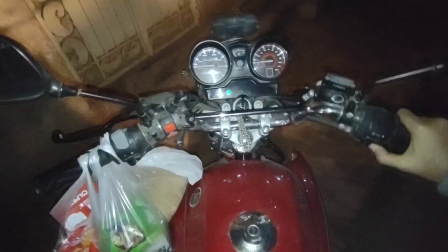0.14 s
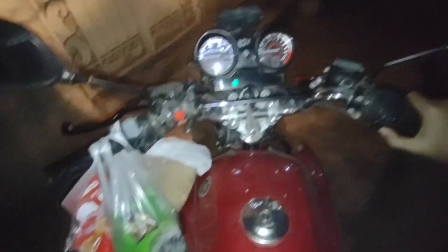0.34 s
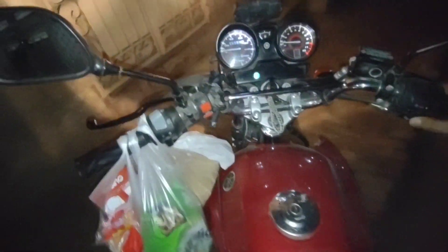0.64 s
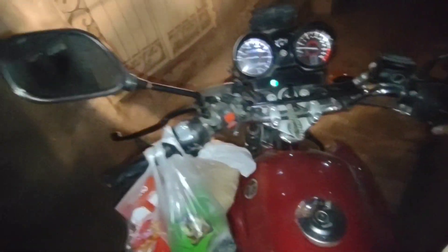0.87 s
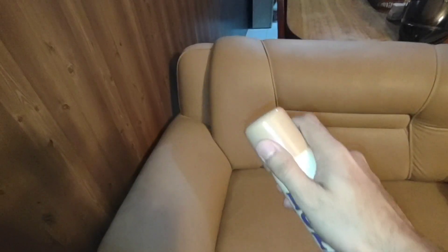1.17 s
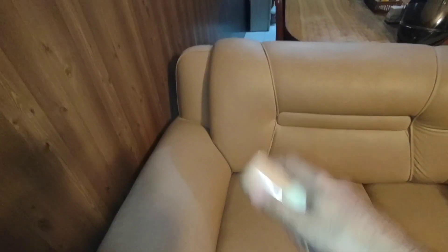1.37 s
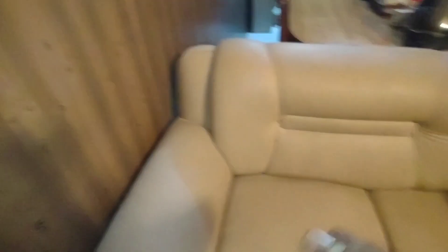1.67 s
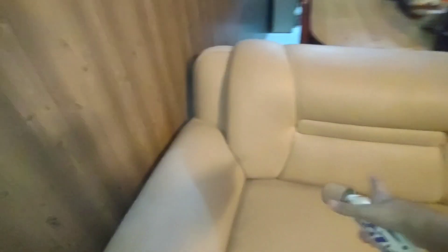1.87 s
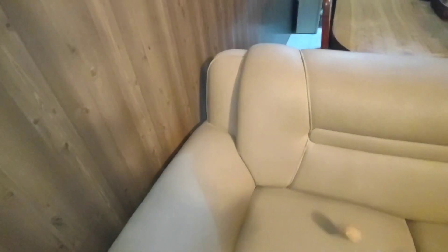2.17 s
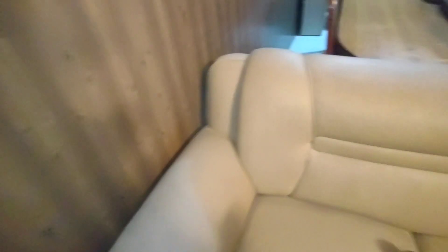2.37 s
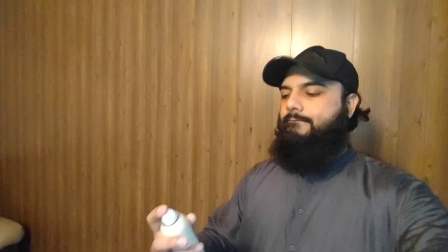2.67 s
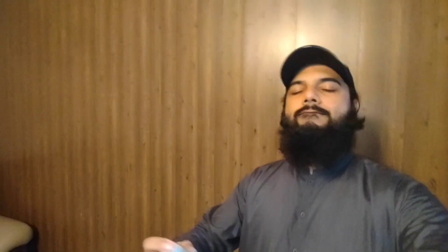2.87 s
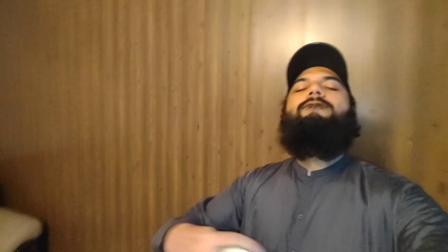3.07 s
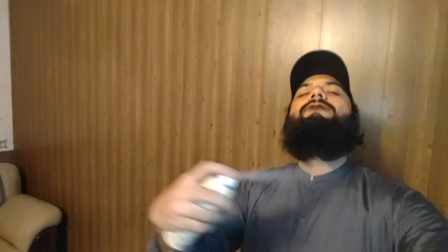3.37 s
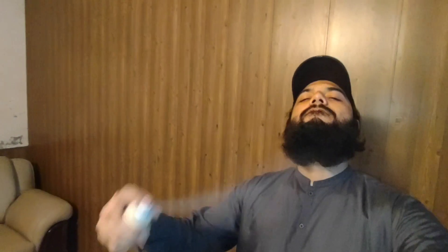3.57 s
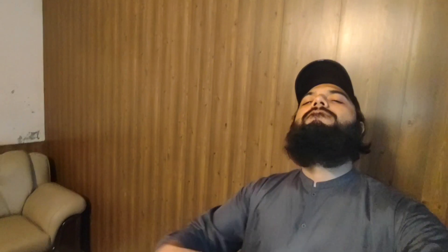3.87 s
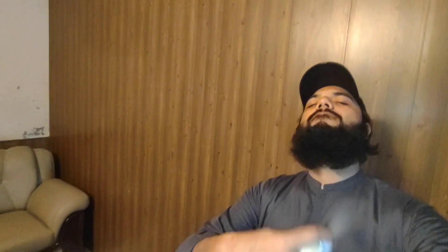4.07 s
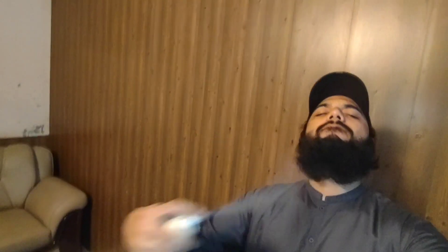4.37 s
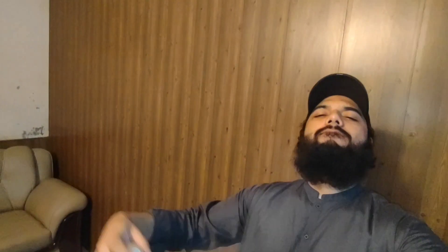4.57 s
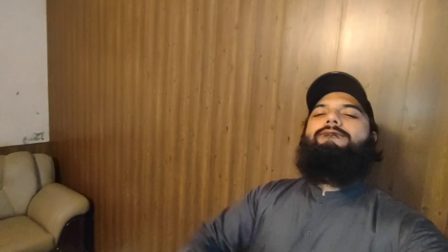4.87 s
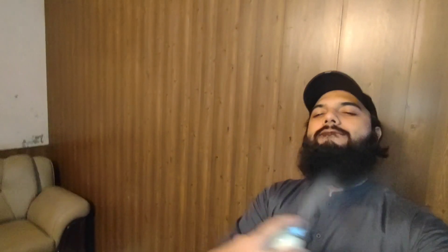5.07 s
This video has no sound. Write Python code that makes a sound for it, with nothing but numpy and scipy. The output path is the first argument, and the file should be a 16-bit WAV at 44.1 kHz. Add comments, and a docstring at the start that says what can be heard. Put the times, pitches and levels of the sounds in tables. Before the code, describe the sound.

After a motorcycle cranks and briefly revs, a spray can lands softly on a cushion indoors, then hisses steadily, sweeping from side to side.

```python
"""Beside a motorcycle, then in a humming room: three short scenes on a stereo microphone, cut hard.
The starter gear whines and grinds; the single cylinder fires, revs up and is cut off abruptly.
Indoors an arm swishes and an aerosol can thumps onto a padded sofa, bounces and settles, cap ticking.
After a moment of silence its valve opens and the jet hisses, swept from side to side by hand."""
import sys
import numpy as np
from scipy import signal
from scipy.fft import rfft, irfft
from scipy.io import wavfile
from scipy.ndimage import uniform_filter1d, map_coordinates

SR = 44100
rng = np.random.default_rng(int(sys.argv[2]) if len(sys.argv) > 2 else 0)


def dump(signal):
    """Clip the signal to [-1, 1] and save it as 16-bit WAV at the path in sys.argv[1]."""
    limited = np.clip(np.atleast_2d(signal).T, -1, 1)
    pcm = np.round(limited * 32767).astype(np.int16)
    wavfile.write(sys.argv[1], SR, pcm)


N = 231084
TIME = np.arange(N) / SR
BIN_HZ = np.maximum(np.arange(N // 2 + 1) * SR / N, 1)


def from_db(db):
    """Decibels to gain."""
    return 10 ** (np.asarray(db) / 20)

def unit_rms(x):
    """Scale to rms 1."""
    return x / np.sqrt(np.mean(x ** 2) + 1e-20)

def over_time(rows):
    """Each column of a (time, values...) table at every sample."""
    times, *columns = np.transpose(rows)
    return [np.interp(TIME, times, column) for column in columns]

def over_bins(points):
    """A (frequency, value) table at every bin, joined on a log axis."""
    hz, value = np.transpose(points)
    return np.interp(np.log(BIN_HZ), np.log(np.maximum(hz, 1)), value)

def ramp(start_s, rise_s):
    """Rise from 0 to 1."""
    return np.clip((TIME - start_s) / rise_s, 0, 1)

def between(start_s, end_s, fade_s=0.00081):
    """Open from start to end, with short ramps."""
    return np.clip(np.minimum(TIME - start_s, end_s - TIME) / fade_s, 0, 1)

def drift(hz):
    """Random wander of rms 1, mostly slower than hz."""
    return unit_rms(irfft(rfft(rng.standard_normal(N)) / (1 + (BIN_HZ / hz) ** 2), N))

def noise(spectrum, likeness):
    """Stereo noise of a given colour and left-right likeness, falling away beyond its ends; rms 1."""
    mid, side = rfft(rng.standard_normal((2, N)))
    alike = np.clip(over_bins(likeness), -1, 1)
    skirts = np.minimum(1, np.minimum(BIN_HZ / spectrum[0][0], spectrum[-1][0] / BIN_HZ)) ** 4
    pair = np.sqrt(1 + alike) * mid + np.sqrt(1 - alike) * side * np.array([[1], [-1]])
    return unit_rms(irfft(pair * from_db(over_bins(spectrum)) * skirts, N))

def cut(x, hz, kind, order=2):
    """A low-pass or high-pass."""
    return signal.sosfilt(signal.butter(order, hz, kind, fs=SR, output="sos"), x + 1e-18)

def resonate(x, resonances):
    """Parallel resonances of (frequency [Hz], width [Hz], level [dB])."""
    out = 0
    for hz, width, db in resonances:
        r, w = np.exp(-np.pi * width / SR), 2 * np.pi * hz / SR
        gain, poles = (1 - r * r) / 2, [1, -2 * r * np.cos(w), r * r]
        out += from_db(db) * signal.lfilter([gain, 0, -gain], poles, x + 1e-18)
    return out

def strike(clicks, modes):
    """Clicks ring modes of (frequency [Hz], level [dB], t60 [s])."""
    out = 0
    for hz, db, t60 in modes:
        r, w = from_db(-60 / (t60 * SR)), 2 * np.pi * hz / SR
        poles = [1, -2 * r * np.cos(w), r * r]
        out += from_db(db) * signal.lfilter([0, np.sin(w)], poles, clicks + 1e-18)
    return out

def impulses(events):
    """One click for each (time [s], level [dB])."""
    out = np.zeros(N)
    for s, db in events:
        out[round(s * SR)] += from_db(db)
    return out

def die_away(clicks, t60):
    """An envelope that jumps at each click and decays."""
    return signal.lfilter([1], [1, -np.exp(-np.log(1000) / (t60 * SR))], clicks + 1e-18)

def steady(x, samples=4000):
    """Hold the slow level at 1 and keep the fast beats."""
    power = np.mean(np.atleast_2d(x) ** 2, axis=0)
    slow_power = uniform_filter1d(uniform_filter1d(power, samples), samples // 2)
    return x / np.sqrt(np.abs(slow_power) + 1e-14)

def pan(x, left_db):
    """Make the left side louder than the right by left_db."""
    return x * from_db(left_db * np.array([[1], [-1]]) / 2)

def lead_left(x, ms):
    """Let a sound reach the left of the microphone first."""
    fine = signal.resample_poly(x * np.ones((2, 1)), 2, 1, axis=1)
    return np.array([map_coordinates(side, [2 * SR * (TIME + sign * ms / 2000)], order=1)
                     for side, sign in zip(fine, (1, -1))])

def reflections(x, t60, dull_hz):
    """A diffuse tail of unit energy, different on each side, dull on top."""
    t = TIME[:SR // 2]
    tail = rng.standard_normal((2, len(t))) * np.exp(-np.log(1000) * t / t60) * (t > .004)
    tail = cut(tail, dull_hz, "low", order=1)
    tail /= np.sqrt(np.sum(tail ** 2) / 2)
    return signal.fftconvolve(np.atleast_2d(x), tail, axes=1)[:, :N]


# the room across the microphone: (frequency [Hz], left-right likeness [0..1])
ROOM_LIKENESS = [(130, 0.94), (300, 0.81), (640, 0.29), (1400, 0.1), (8000, 0.05)]
# the air in each indoor scene, and the tones of the hum: (frequency [Hz], level [dB])
AIR_AT_SOFA = [(24, -42.5), (40, -28), (82, -4), (119, -34.5), (156, -5), (206, -5.5), (338, -12.5),
               (422, -23), (582, -20), (728, -26), (845, -25.5), (1260, -31), (3300, -36), (5990, -42.5),
               (15000, -46.5)]
AIR_AT_SPRAY = [(29, -63), (50, -26), (91, -18), (105, -18), (124, 0.5), (150, -18), (209, -4.5),
                (242, -23.5), (272, -13), (399, -23), (643, -19.5), (742, -24), (919, -22), (1670, -34),
                (15000, -47.5)]
HUM_TONES = [(124.5, 0), (201, 0)]

def room_tone(air, hum_db, waver=0.0094):
    """Low moving air all round the microphone, with a wavering hum."""
    hum = 0
    for hz, db in HUM_TONES:
        gain = from_db(db + 2.1 * drift(5.8))
        pitch_hz = hz * (1 + waver * drift(11.4))
        hum += gain * np.sin(2 * np.pi * np.cumsum(pitch_hz) / SR)
    return unit_rms(noise(air, ROOM_LIKENESS) + from_db(hum_db) * unit_rms(hum))


# the swish of the arm: (frequency [Hz], level [dB])
SWISH_SPECTRUM = [(710, -33), (1200, -11), (1420, -14), (1560, -9), (2040, -2), (2430, -12), (2640, -11),
                  (3210, -19), (3640, -8), (4180, -23), (5000, -25), (6500, -45), (11000, -120)]

def arm_swish(peak_s=1.646, rise_db_per_s=45, fall_db_per_s=83, fizz_width_s=0.04):
    """The swinging arm gathers speed, brightens for a moment and slows."""
    t = TIME - peak_s
    swell = from_db(-65.5 + np.minimum(rise_db_per_s * t, -fall_db_per_s * t)) * ramp(1.41, 0.04)
    body = swell * noise(SWISH_SPECTRUM, ROOM_LIKENESS)
    fizz = noise([(4500, 4), (9000, -5), (15000, -9)], ROOM_LIKENESS)
    return body + from_db(-71) / (1 + (t / fizz_width_s) ** 2) * fizz


# the can lands on the cushion: (time [s], level [dB])
LANDINGS = [(2.127, -27.5), (2.136, -20), (2.172, -26.5), (2.19, -30), (2.25, -34.5), (2.306, -38),
            (2.338, -36), (2.465, -45), (2.5, -41.5), (2.517, -45.5)]
# cushion and frame: (frequency [Hz], level [dB], t60 [s])
SOFA_MODES = [(92, -4.5, 0.08), (126.6, 0.5, 0.068), (189.6, -4.5, 0.086), (296, -14, 0.073),
              (452, -22, 0.068)]

def sofa_thumps():
    """Each landing thumps the sofa, booms in the room and creases the cover."""
    landings = impulses(LANDINGS)
    soft_blows = cut(landings, 353, "low")
    thumps = cut(strike(soft_blows, SOFA_MODES), 71, "high", order=5)
    centre_boom = from_db(-8.5) * reflections(thumps, 0.29, 8200)[0]
    wide_boom = from_db(-17) * reflections(thumps, 0.48, 9000)
    fabric = noise([(200, 5.5), (350, -0.5), (600, -13), (1200, -20), (3000, -22)], ROOM_LIKENESS)
    rustle = from_db(-36) * die_away(landings, t60=0.67) * fabric
    return thumps + centre_boom + wide_boom + rustle


# ticks of the cap and shell: (time [s], level [dB])
CAP_TICKS = [(1.871, -53), (2.129, -40.5), (2.332, -48), (2.459, -54.5), (2.499, -46.5), (2.507, -42.5)]
# their colour: (frequency [Hz], level [dB])
TICK_SPECTRUM = [(290, -9), (500, -4.5), (855, -16), (1050, -2), (1510, -9), (1670, -8.5), (2390, -9.5),
                 (3590, -11.5), (4940, -13.5), (9000, -20), (16000, -27)]

def can_ticks():
    """The tossed can's cap and shell tick, and the walls answer."""
    ticks = from_db(0.5) * die_away(impulses(CAP_TICKS), t60=0.02) * noise(TICK_SPECTRUM, ROOM_LIKENESS)
    return ticks + from_db(-5) * reflections(ticks, 0.42, 4300)


# the starter turning the engine: (time [s], tooth rate [Hz], level [dB])
CRANKING = [(0, 1110, -36), (0.06, 1180, -39.5), (0.12, 1205, -37), (0.14, 1375, -44), (0.168, 1385, -44.5),
            (0.186, 1245, -34.5), (0.202, 1100, -29.5), (0.235, 800, -35), (0.26, 790, -78.5)]
# partials of the whine: (multiple of tooth rate, level [dB])
GEAR_PARTIALS = [(1, -11), (2, -1.5), (3, -19), (7, -21), (8, -18)]
# the housing, rung by grinding teeth: (frequency [Hz], width [Hz], level [dB])
HOUSING_RESONANCES = [(312, 8.3, 7), (2300, 83, -3.5), (2650, 110, -2), (3660, 100, -2),
                      (9000, 1500, -15.5), (12100, 160, -12)]

def starter_gear(roughness=0.008, strain_s=0.17):
    """Right of the microphone the gear whines, grinds and squeals as it sags under compression."""
    tooth_hz, level_db = over_time(CRANKING)
    phase = 2 * np.pi * np.cumsum(tooth_hz * (1 + roughness * drift(300))) / SR
    whine = unit_rms(sum(from_db(db) * np.sin(round(k) * phase) for k, db in GEAR_PARTIALS))
    whine *= from_db(-2.5 + 3.5 * ramp(strain_s, 0.018))
    grind = from_db(-2) * steady(resonate(rng.standard_normal(N), HOUSING_RESONANCES))
    gear = (whine + grind) * from_db(level_db - 1.5 + 1.9 * drift(140))
    return pan(gear + from_db(-3) * reflections(gear, 0.12, 5400), left_db=-8.5)


# the motorcycle across the microphone: (frequency [Hz], left-right likeness [0..1])
BIKE_LIKENESS = [(100, 0.93), (400, 1), (700, 0.41), (1300, 0.028), (2400, 0.15), (5500, 0.0), (8000, 0.65),
                 (14000, 0.45)]
# blows on the starter drive: (time [s], level [dB])
DRIVE_KICKS = [(0.229, -19), (0.234, -5), (0.24, -13.5), (0.258, -18.5)]
# its ringing: (frequency [Hz], level [dB], t60 [s])
DRIVE_MODES = [(140, -16, 0.12), (289.8, -8, 0.18), (439, -11.5, 0.22), (513, -7.5, 0.06),
               (535, -7.5, 0.034), (1235, -11.5, 0.04), (1850, -14.5, 0.03), (2310, -6, 0.05),
               (2800, -13.5, 0.045)]

def starter_kick():
    """The first firing kicks the starter drive free with a crack and a clunk."""
    kicks = impulses(DRIVE_KICKS)
    crack = noise([(400, -0.5), (2600, -11), (5000, -14), (14000, -27.5)], BIKE_LIKENESS)
    crack *= from_db(-10) * die_away(kicks, t60=0.025)
    clunk = cut(from_db(0.5) * strike(kicks, DRIVE_MODES), 130, "high")
    return lead_left(clunk + crack, ms=0.3)


def effort(crank_db, kick_db, idle_db, rev_db, rise_s, settle_s=np.inf, pull_db=0):
    """Gain of an engine part: it cranks, shudders, idles, jumps with the throttle and grows with load."""
    catch_s, throttle_s = 0.28, 0.466
    load_lag_s, full_pull_hz_per_s = 0.043, 60   # the load builds up behind the acceleration
    acceleration = np.gradient(over_time(ENGINE_SPEED)[0]) * SR / full_pull_hz_per_s
    pole = np.exp(-2 / (load_lag_s * SR))
    pull = signal.lfilter([(1 - pole) ** 2], [1, -2 * pole, pole ** 2], acceleration)
    throttle = ramp(throttle_s, rise_s) * np.exp(-np.maximum(TIME - throttle_s - rise_s, 0) / settle_s)
    cranking = from_db(over_time(CRANKING)[1] + crank_db)
    shudder = from_db(kick_db) * die_away(impulses(DRIVE_KICKS), t60=0.25)
    running = ramp(catch_s, 0.049) * from_db(idle_db + rev_db * throttle + pull_db * pull)
    return np.sqrt(cranking ** 2 + shudder ** 2 + running ** 2)


# air at the throttle: (frequency [Hz], level [dB])
INTAKE_SPECTRUM = [(2060, -32), (3500, -1.5), (4080, 1), (5370, -3.5), (6620, -2), (7200, 0), (8620, 2),
                   (10300, -2.5), (11500, -6.5), (15000, -35.5), (22000, -120)]

def intake(puff):
    """Air hisses past the opening throttle, pulsing with each firing."""
    air = noise(INTAKE_SPECTRUM, BIKE_LIKENESS)
    air *= effort(crank_db=-5, kick_db=-30.5, idle_db=-50, rev_db=21,
                  rise_s=0.046, settle_s=0.4, pull_db=1)
    top = noise([(11500, -7), (14000, 1.5), (16000, -2.5)], BIKE_LIKENESS)
    top *= effort(crank_db=-7.5, kick_db=-39, idle_db=-52, rev_db=24, rise_s=0.037, settle_s=0.25)
    return (1 + puff) * (air + top)


# the engine covers: (frequency [Hz], width [Hz], level [dB])
COVER_RESONANCES = [(797.5, 18, 3.5), (908.6, 66, 4.5), (1035, 30, -5.5), (1164, 79, 3), (1251, 9, -0.5),
                    (1660, 72, -5), (1784, 6.3, -8.5), (2060, 290, -7.5), (2430, 14, -6.5),
                    (2900, 14, -6.5)]
# their clatter: (frequency [Hz], level [dB])
CLATTER_SPECTRUM = [(88, -25), (150, -1), (231, -12.5), (300, -8.5), (397, -14.5), (435, -7), (691, -19.5),
                    (913, -9.5), (1570, -14.5), (2300, -16), (3240, -22), (6000, -53), (7800, -67),
                    (13200, -120)]

def covers(puff, gas, beat_depth=0.52):
    """Each firing sends a wave of ringing and clatter through the covers."""
    beat = (1 + beat_depth * puff) * from_db(0.5 * drift(250))
    ring = steady(cut(resonate(beat * gas, COVER_RESONANCES), 5200, "low"))
    ring *= effort(crank_db=1.5, kick_db=-22.5, idle_db=-36.5, rev_db=8, rise_s=0.11, pull_db=1.5)
    clatter = steady(beat * noise(CLATTER_SPECTRUM, BIKE_LIKENESS))
    clatter *= effort(crank_db=3, kick_db=-19, idle_db=-35.5, rev_db=9,
                      rise_s=0.051, settle_s=0.9, pull_db=2.5)
    return ring + clatter


# the engine casing: (frequency [Hz], width [Hz], level [dB])
CASING_RESONANCES = [(183, 33, -10), (264, 43, -11), (295.4, 16, 5.5), (341, 40, -11), (425, 7, 3),
                     (506, 33, -18)]

def casing(knocks, puff, gas):
    """Knocks and rushing gas ring the casing, which swells and drops unevenly."""
    ring = resonate(knocks + 0.051 * (puff + 1) * gas, CASING_RESONANCES)
    ring = cut(cut(ring, 650, "low"), 150, "high")
    ring = steady(ring, samples=1600) * from_db(drift(28))
    return ring * effort(crank_db=-1, kick_db=-22, idle_db=-29, rev_db=2.5, rise_s=0.033, pull_db=4.5)


# a silencer chamber: (frequency [Hz], width [Hz], level [dB])
CHAMBER_RESONANCES = [(100, 60, 12.5), (170, 35, -2)]

def exhaust(firings, puff, gas, overrun_s=0.783, overrun_db=6):
    """Two silencer chambers round off each pulse; the pipe booms once the revs top out."""
    blast = firings + 0.014 * (puff + 0.5) * gas
    first_chamber = resonate(blast, CHAMBER_RESONANCES)
    thud = steady(resonate(first_chamber, CHAMBER_RESONANCES), samples=3200)
    thud *= effort(crank_db=-7.5, kick_db=-23.5, idle_db=-33, rev_db=11.5,
                   rise_s=0.067, settle_s=2.5, pull_db=2.5)
    return thud * from_db(overrun_db * ramp(overrun_s, 0.054))


# the revs climb and fall back: (time [s], firing rate [Hz])
ENGINE_SPEED = [(0.256, 11.5), (0.367, 14.9), (0.48, 16.6), (0.57, 16.9), (0.61, 18.9), (0.657, 23.5),
                (0.735, 28.0), (0.8, 29.8), (0.87, 28.5), (0.945, 27.0), (1.04, 21.5)]

def engine():
    """Near the microphone one cylinder fires unevenly, driving exhaust, casing, covers and intake."""
    firing_hz, = over_time(ENGINE_SPEED)
    cycles = np.cumsum(firing_hz * (TIME > ENGINE_SPEED[0][0])) / SR
    firings = np.diff(np.ceil(cycles), prepend=0) * from_db(1.8 * drift(30))
    knocks = firings * (firing_hz / firing_hz.max()) ** 2   # slow firings hardly jolt the casing
    puff = die_away(firings, t60=0.028)
    gas = noise([(40, 0), (4000, 0)], BIKE_LIKENESS)
    body = exhaust(firings, puff, gas) + casing(knocks, puff, gas) + covers(puff, gas)
    return lead_left(body, ms=0.27) + intake(puff)


# where the hand turns the can back: (time [s], side [-1 right to 1 left])
HAND_TURNS = [(3.3, -0.41), (3.7, 0.7), (4.22, -0.56), (4.64, 0.85), (5.12, -0.36)]

def hand_sweep():
    """The hand eases from one turning point to the next like a pendulum."""
    times, sides = np.transpose(HAND_TURNS)
    turns = np.arange(len(times))
    leg, part = np.divmod(np.interp(TIME, times, turns), 1)
    return np.interp(leg + (1 - np.cos(np.pi * part)) / 2, turns, sides)


# the spray across the microphone: (frequency [Hz], left-right likeness [0..1])
SPRAY_LIKENESS = [(500, 1), (1400, 0.75), (3000, 0.78), (6500, 0.72), (8200, 0.91), (12000, 0.98)]
# the nozzle and the two bands of the plume: (frequency [Hz], level [dB])
NOZZLE_SPECTRUM = [(3530, -44), (6000, -24), (7280, -16), (8650, -4), (11700, -7), (15100, 2.5),
                   (16000, -1)]
LOW_PLUME_SPECTRUM = [(480, -12), (600, -9.5), (800, -3), (1200, -1.5), (2500, 0), (2900, -2.5),
                      (4500, -5.5)]
HIGH_PLUME_SPECTRUM = [(3500, -1), (5000, 0.5), (7500, -1)]
# the nozzle's beam at the microphone: (frequency [Hz], extra left over right [dB])
NOZZLE_BEAM = [(6000, -15.5), (8300, -3.5), (10500, -3), (13000, 3.5), (15500, 0.5)]
# the jet with the valve fully open: (time [s], level [dB])
JET_STRENGTH = [(3.45, -42), (3.52, -39.5), (3.58, -38.5), (3.635, -42.5), (3.7, -37.5), (3.77, -37),
                (3.84, -41.5), (3.925, -36.3), (4.01, -40), (4.07, -38), (4.33, -36), (4.42, -37),
                (4.555, -34.5), (4.615, -40.5), (4.7, -38), (4.78, -40.0), (5.11, -36.3), (5.22, -37)]

def spray(leak_s=3.22, press_s=3.42, sputter_db=0.98):
    """Close by, the nozzle hisses very high and the wider plume rushes lower; both swing with the hand."""
    side = hand_sweep()
    nozzle = noise(NOZZLE_SPECTRUM, SPRAY_LIKENESS)
    beamed = irfft(pan(rfft(nozzle), over_bins(NOZZLE_BEAM)), N)
    hiss = pan(from_db(1) * beamed, left_db=-5.5 + 4.5 * side)
    high_plume = from_db(-17) * noise(HIGH_PLUME_SPECTRUM, SPRAY_LIKENESS)
    low_plume = from_db(-16.5 - 2.7 * side) * noise(LOW_PLUME_SPECTRUM, SPRAY_LIKENESS)
    rush = pan(lead_left(low_plume + high_plume, ms=0.22 * side), left_db=-2.5 + 1.7 * side)
    jet_db, = over_time(JET_STRENGTH)
    leak = from_db(-56) * ramp(leak_s, 0.11)   # the half-pressed valve leaks first
    pressed = ramp(press_s, 0.035)
    flow = pressed * from_db(jet_db) + (1 - pressed) * leak
    sputter = from_db(sputter_db * drift(63))   # droplets make the flow slightly uneven
    return flow * sputter * (hiss + rush)


def scene(bike_end_s=1.044, sofa_end_s=2.606, spray_start_s=2.672):
    """Motorcycle, sofa and spray follow one another with hard cuts."""
    bike = pan(engine() + starter_gear() + starter_kick(), left_db=-1.2)
    toss = arm_swish() + sofa_thumps() + can_ticks()
    sofa_room = from_db(-58 - 5 * (TIME - bike_end_s)) * room_tone(AIR_AT_SOFA, hum_db=-2)
    jet = spray()
    spray_room = from_db(-65 + 2.35 * (TIME - spray_start_s)) * room_tone(AIR_AT_SPRAY, hum_db=-5.5)
    return (bike * between(0, bike_end_s)
            + (toss + sofa_room) * between(bike_end_s, sofa_end_s)
            + (jet + spray_room) * between(spray_start_s, np.inf))

def record(dry, cutoff_hz=15900):
    """The highest peaks are rounded and the top is cut steeply."""
    return signal.sosfilt(signal.ellip(12, .1, 80, cutoff_hz, fs=SR, output="sos"), np.tanh(dry))


dry = scene()
out = record(dry)
dump(out)
```